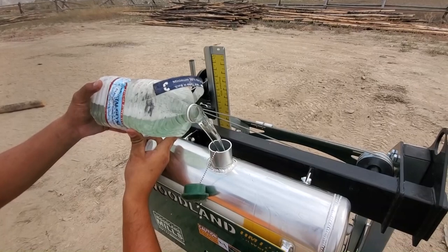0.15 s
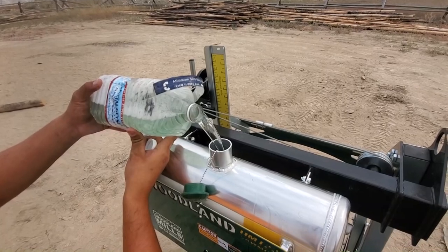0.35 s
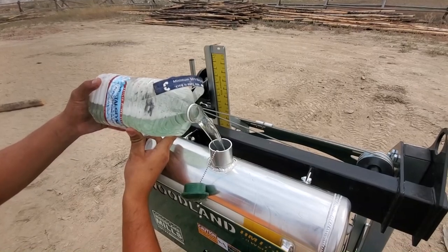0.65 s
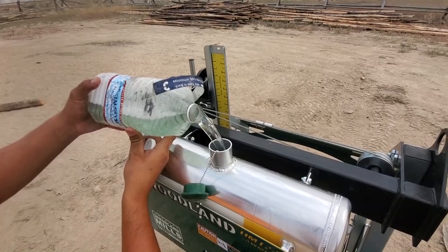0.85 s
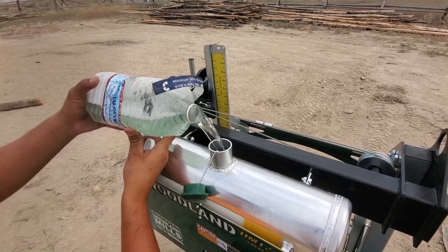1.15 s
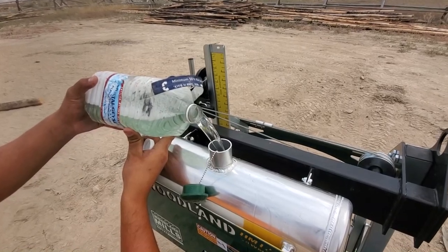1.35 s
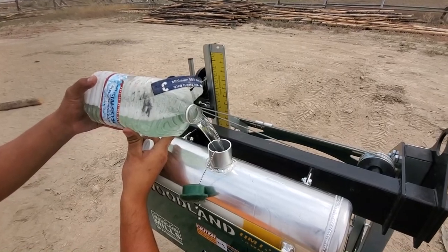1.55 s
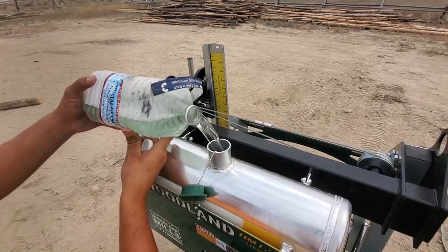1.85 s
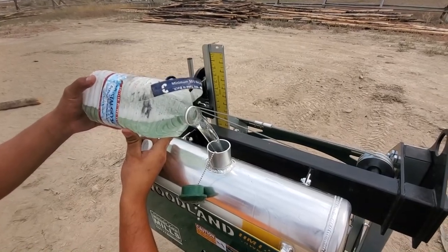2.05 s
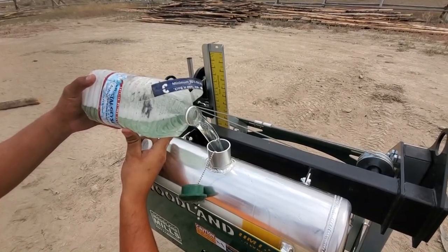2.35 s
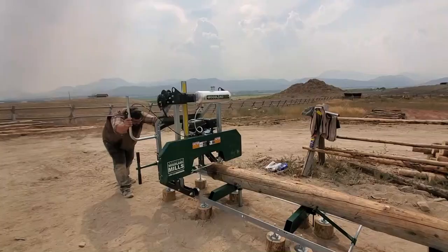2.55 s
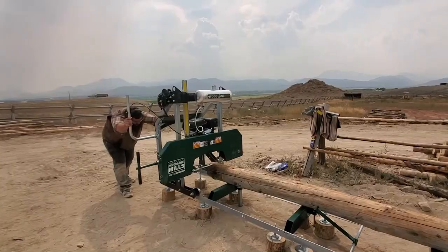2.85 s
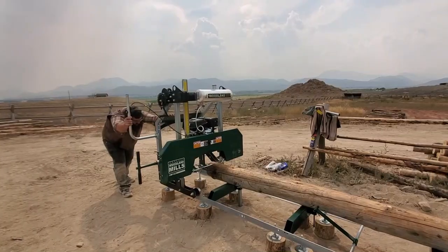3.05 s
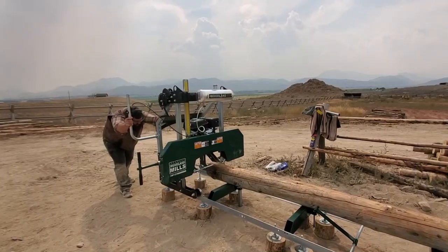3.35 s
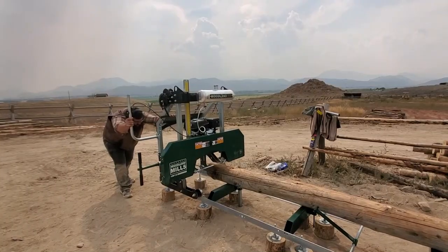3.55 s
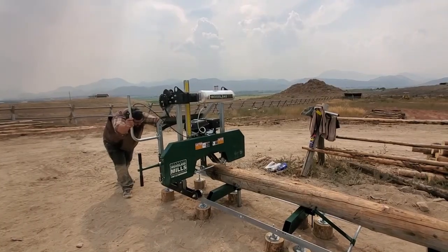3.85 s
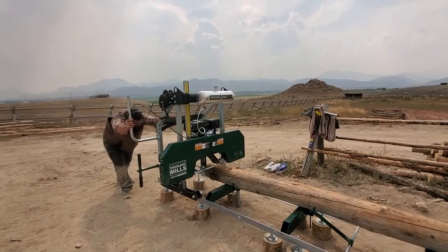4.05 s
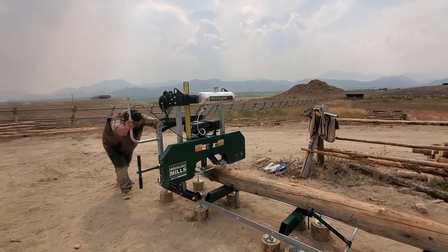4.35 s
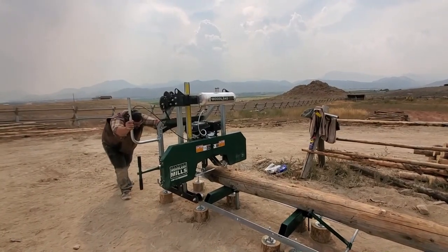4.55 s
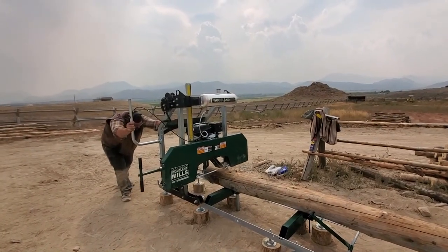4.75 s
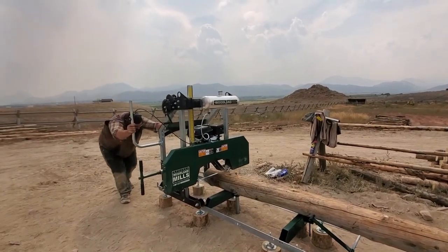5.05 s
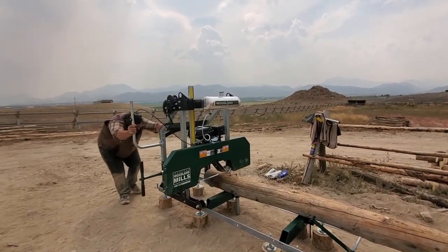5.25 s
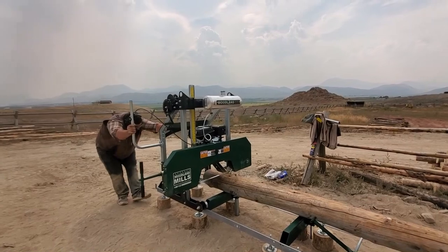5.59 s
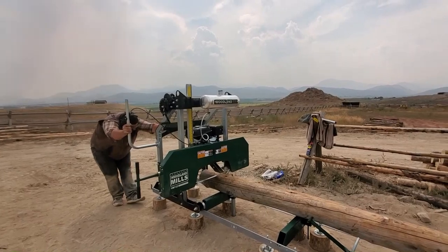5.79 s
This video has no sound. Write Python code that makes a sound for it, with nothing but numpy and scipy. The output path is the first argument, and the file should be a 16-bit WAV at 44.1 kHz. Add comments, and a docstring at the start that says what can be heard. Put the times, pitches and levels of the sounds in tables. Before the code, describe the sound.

Faint close pouring with hollow plops, a brief silence, then a roaring small engine and whining band blade that bites harshly into wood.

```python
"""Water pours into a small metal tank, close up: hissing stream, splashes and bubbles over a distant engine hum.
After a short silent gap a small gasoline sawmill runs outdoors: firing orders and a throbbing roar make
the engine drone, and resonant noise makes the free band blade sing high to the right. Then the blade bites
into a log and rasps lower, in noise whose rings and hiss shift. Wind puffs on the microphone."""
import sys
import numpy as np
from scipy import signal
from scipy.fft import rfft, irfft, next_fast_len
from scipy.io import wavfile
from scipy.ndimage import uniform_filter1d, map_coordinates

SR = 44100
rng = np.random.default_rng(int(sys.argv[2]) if len(sys.argv) > 2 else 0)


def put_to_file(sound):
    """Save the sound as 16-bit audio at rate SR, in the file named by the first command-line argument."""
    columns = np.atleast_2d(sound).T  # one column per channel
    safe = np.clip(columns, -1, 1)
    whole_steps = np.round(safe * 32767)
    wavfile.write(sys.argv[1], SR, whole_steps.astype(np.int16))


N = 261072

# Spectra are relative densities, modes are resonances; each finished layer gets its level separately.

# Engine firing orders: (multiple of the firing rate [1], level [dB])
FIRING_ORDERS = [(1, -24), (2, 1), (3, -21), (4, -5), (5, -3), (6, -42), (7, -16), (8, -7), (9, -17.5),
                 (10, -11.5), (11, -6), (12, -12.5), (13, -7.5), (14, -16.5), (15, -23), (16, -33),
                 (17, -24.5), (18, -18.5), (19, -31), (20, -13), (21, -16.5), (22, -14), (23, -10),
                 (24, -11), (25, -11.5), (26, -10), (27, -8), (28, -14.5), (29, -12.5), (30, -12)]
# Firing rate of the engine: (time [s], firings [1/s])
FIRING_RATE = [(2.43, 28.85), (3.5, 28.9), (4.7, 28.85), (5.0, 28.7), (5.92, 28.7)]
# Engine roar spectrum: (frequency [Hz], density [dB])
ROAR_SPECTRUM = [(20, -40), (40, -12), (100, -11.5), (250, -10), (500, -8.5), (900, -11), (1050, -6.5),
                 (2000, -8.5), (3500, -13.5), (7300, -21.5), (9000, -31)]
# Cowl and guard modes: (frequency [Hz], width [Hz], level [dB])
HOUSING_MODES = [(84, 15, -5), (225, 100, -5), (365, 84, -1), (658, 95, -2.5), (742, 154, -3.5),
                 (870, 82, -1.5), (1152, 108, -3), (1522, 24, -6), (1640, 42, -3.5), (1873, 32, -7),
                 (2120, 82, -1)]
# Cooling fan spectrum: (frequency [Hz], density [dB])
FAN_SPECTRUM = [(6000, -90), (7200, -46), (7700, -7), (9000, -7.5), (12300, -14.5), (12700, -4),
                (13500, -14), (14900, -8), (15500, 3.5), (16400, -5.5)]
# Free blade's broad sheen: (frequency [Hz], density [dB])
SHEEN_SPECTRUM = [(5000, -90), (6000, -32), (7500, -24.5), (9000, -12.5), (11000, -16), (14000, -15.5),
                  (16400, -20.5)]
# Singing modes of the free blade: (frequency [Hz], width [Hz], level [dB])
SINGING_MODES = [(7730, 55, -16), (9166, 800, -3.5), (9830, 200, -5), (12830, 280, -2.5),
                 (14900, 300, -7.5)]
# Whirr of the blade in its guides: (frequency [Hz], density [dB])
WHIRR_SPECTRUM = [(500, -90), (1500, -29), (2500, -8), (3300, -9), (4000, -24), (5000, -56)]
# Guide modes: (frequency [Hz], width [Hz], level [dB])
GUIDE_MODES = [(3226, 340, -1), (3500, 104, 4)]
# Strength of the whirr: (time [s], level [dB])
WHIRR_LEVEL = [(2.43, -36), (3.11, -36), (3.62, -28), (3.9, -30.5), (4.72, -29.5)]
# Hiss of the blade over its wheels: (frequency [Hz], density [dB])
WHEEL_SPECTRUM = [(2000, -90), (3000, -56), (3800, -0.5), (5000, -8), (7000, -11.5), (9000, -33)]
# Wheel modes: (frequency [Hz], width [Hz], level [dB])
WHEEL_MODES = [(3760, 150, -3), (4880, 76, -2), (5630, 58, 0)]
# Rasp of the teeth in wood: (frequency [Hz], density [dB])
RASP_SPECTRUM = [(900, -63), (1500, -11.5), (2300, -7), (3400, -0.5), (3800, -8), (5500, -8), (7000, -43),
                 (9000, -50)]
# Modes in the rasp: (frequency [Hz], width [Hz], level [dB])
RASP_MODES = [(2460, 310, 0.5), (3143, 200, 5.5), (3500, 90, -11), (4170, 37, 0)]
# Low, then high ring of the blade held in the wood, each a list of (frequency [Hz], width [Hz], level [dB])
KERF_MODES = [
    [(2051, 42, 5.5), (2127, 120, 1.5)],
    [(2740, 59, 0), (2830, 110, 6)],
]
# Strength of those rings: (time [s], low ring [dB], high ring [dB])
RING_LEVELS = [(4.79, -32, -42), (4.86, -31.5, -36), (5.0, -26, -26.5), (5.1, -25, -23.5),
               (5.18, -31.5, -37), (5.33, -28.5, -31), (5.4, -25, -23.5), (5.6, -31, -24.5),
               (5.92, -48, -23.5)]
# Sinking centre of the cutting hiss: (time [s], frequency [Hz])
HISS_CENTRE = [(4.7, 7240), (4.95, 6370), (5.15, 5970), (5.35, 5200), (5.92, 4460)]
# Splashes: (time [s], reference level [dB], bubble pitch [Hz], wall slap over the reference [dB])
SPLASHES = [(.18, -40, 2700, -25), (.197, -44, 1027, -14), (.287, -50, 2300, 0), (.364, -54, 1640, 0),
            (.408, -42, 1630, -8), (.477, -41, 1640, -10), (.522, -40, 2240, -8), (.623, -49.5, 2170, 2),
            (.704, -39, 2260, -20), (.824, -44, 1050, -14), (.857, -47, 708, -4), (1.022, -37, 1026, -21),
            (1.082, -43, 1650, -23), (1.285, -38.5, 2160, -26), (1.435, -45, 2190, -15),
            (1.452, -45, 1024, -20), (1.561, -46, 1044, -8), (1.574, -37.5, 1027, -6),
            (1.731, -45, 627, -3), (1.775, -46, 990, -20), (1.865, -40, 1770, -22), (1.914, -42, 1510, -22),
            (2.19, -46, 2280, -8), (2.328, -36.5, 1610, -17)]
# Strength of the stream: (time [s], level [dB])
FLOW_LEVEL = [(0, -56.5), (.1, -55.5), (.6, -56.5), (.76, -58.5), (.89, -55.5), (.97, -58), (1.2, -54.5),
              (1.4, -61), (1.46, -59.5), (1.53, -58.5), (1.77, -57.5), (2.34, -58)]
# Stream spectrum: (frequency [Hz], density [dB])
STREAM_SPECTRUM = [(500, -49), (800, -17), (2000, -9), (4000, -26), (6000, -16.5), (8000, -38),
                   (11000, -70)]
# Air and wall modes of the tank: (frequency [Hz], width [Hz], level [dB])
TANK_MODES = [(1027, 29, 2), (1534, 56, -2), (1685, 105, 0.5), (1880, 68, -5), (2160, 59, -5.5),
              (2308, 150, -5), (2683, 82, -1.5), (3190, 510, -3), (3720, 160, -9), (4350, 160, -12.5),
              (5290, 190, -17)]
# Spray spectrum: (frequency [Hz], density [dB])
SPRAY_SPECTRUM = [(4000, -44), (5300, -6.5), (6950, -6.5), (7500, -13.5), (9400, 4), (11300, -6.5),
                  (12500, -5), (15000, -15), (16400, -22)]
# Gurgle spectrum: (frequency [Hz], density [dB])
GURGLE_SPECTRUM = [(120, -48), (250, -16), (500, -9), (750, -3.5), (900, 0), (1100, -43)]
# Lowest air modes of the tank: (frequency [Hz], width [Hz], level [dB])
HOLLOW_MODES = [(380, 25, -17), (644, 40, 8), (702, 36, 7)]
# Air gulps in the tank: (time [s], level [dB])
GLUGS = [(.06, -66), (.55, -64), (.87, -65), (1.04, -68), (1.27, -63), (1.46, -80), (1.58, -66),
         (1.77, -58), (2.19, -76)]
# Water slapping the wall: (frequency [Hz], density [dB])
SLAP_SPECTRUM = [(1200, -50), (2200, -10), (3300, 5), (4400, 0), (5500, -16), (7000, -40)]
# Wind puffs on the ports: (time [s], half length [s], level [dB])
PUFFS = [(4.59, 0.025, -38), (4.967, 0.044, -38), (5.115, 0.037, -37), (5.62, 0.038, -33)]
# Wind buffeting spectrum: (frequency [Hz], density [dB])
BUFFET_SPECTRUM = [(15, -35), (40, -5), (60, -4), (110, -7), (200, -9), (350, -10), (600, -50)]
# Orders of the distant engine: (frequency [Hz], relative level [dB])
FAR_HUM_TONES = [(58.6, 1.5), (87.9, -5.5), (117.2, -19.5), (146.5, -19)]
# Hum level and unrest: (time [s], level [dB], depth of its dips [dB])
HUM_WAVERS = [(0, -60, .3), (.65, -60.5, .5), (1.0, -64, 2), (1.2, -60, 5), (1.8, -59.5, 5), (2.34, -59, 4)]
# Rumble under the hum: (frequency [Hz], density [dB])
FAR_RUMBLE_SPECTRUM = [(20, -48), (40, -21), (100, -22), (200, -38.5), (500, -43), (800, -66)]
# Treble edge of the microphone: (frequency [Hz], gain [dB])
MIC_RESPONSE = [(15700, 0), (15850, -30), (16000, -52), (16430, -68)]
# Engine at the two ports: (frequency [Hz], likeness [0-1], left minus right [dB], left leads by [rad])
MILL_PORTS = [(200, 1, 0, 0), (260, .95, -1.5, .1), (400, .85, -2.5, .2), (500, .88, -1, .2),
              (570, .99, -.3, .1), (700, .92, -.8, .35), (900, .9, -.8, .45), (1200, .75, -1, 1),
              (1400, .55, -1, 1.3), (1700, .15, 0, 0), (2050, .4, 0, -1), (4000, .3, -3, 0)]
# Fan at the ports: (frequency [Hz], likeness [0-1], left minus right [dB], left leads by [rad])
FAN_PORTS = [(7500, 0.35, 13, 2.5), (12000, 0.25, 9.7, 1), (15500, .3, 14.8, 1.8)]
# Free blade at the ports: (frequency [Hz], likeness [0-1], left minus right [dB], left leads by [rad])
SING_PORTS = [(2490, 0.2, -5.5, -2.5), (3140, 0.76, -7.5, 0), (4200, 0.35, -20.5, -2.8),
              (6150, 0.25, -12.5, 3.5), (9770, 0.97, -21.5, 1), (10100, 0.2, -15.5, 4.5),
              (15000, .3, -27, -2)]
# Cutting at the ports: (frequency [Hz], likeness [0-1], left minus right [dB], left leads by [rad])
RASP_PORTS = [(1500, .3, -5, 0), (2100, .75, -6, 0), (2800, .75, -14, 2.8), (3600, .6, -13, 3.8),
              (5300, .6, -12, 6.9), (7000, .4, -9, 10)]
# Pour at the ports: (frequency [Hz], likeness [0-1], left minus right [dB], left leads by [rad])
POUR_PORTS = [(60, .9, -1.5, 1), (210, 0.4, 0, 0), (770, 1, 0.5, -1.6), (1130, 0.56, 3, -0.2),
              (1760, 0.3, -10.5, 1), (2300, 0.45, -4, 0.1), (3220, 0, -14.5, -1), (4300, 0.2, -1.5, 0.5),
              (6400, 0, -7, 0.5), (9800, .2, -5.5, 2.5), (15000, .3, 1, -0.5)]

POUR_END_S, MILL_START_S = 2.342, 2.4205
BITE_S = 4.76  # the teeth reach the wood
# the level of engine, fan, singing and wheel hiss is faded up once
FADE_UP_START_S, FADE_UP_S, FADE_UP_DB = 3.05, 0.59, 4.5
DRONE_DB, ROAR_DB, FAN_DB = -31, -29, -32  # before the fade-up
LOAD_DB_PER_S = 0.9  # drone and roar keep growing while the blade is in the wood
SING_DB, SING_FLARE_DB = -27, 4  # before the fade-up; flare as the teeth touch
TOUCH_S, TOUCH_HALF_S = 4.79, 0.016  # first scrape of the teeth
SING_DAMP_DB, SING_DAMP_START_S, SING_DAMP_S = 20.5, 4.84, 0.065  # the wood stills the singing
WHEEL_DB, WHEEL_FADE_UPS = -37, 1.93  # level before the fade-up; multiple of its dB
RASP_DB, RASP_FADE_DB_PER_S = -21.5, 1.5
HISS_DB, HISS_FADE_DB_PER_S = -29.5, 3.5
RING_WAVER_DB = 1.5
SPRAY_DB, SPRAY_FOLLOWS = -67.5, 0.97  # mean level; share of the stream's swings
GURGLE_DB, GURGLE_RISE_DB_PER_S, GURGLE_WAVER_DB = -76.5, 6, 1  # grows as the tank fills
GLUG_HALF_S = 0.024
WASH_DB, THROW_DB, BUBBLE_DB = -14, -18, -10  # surge, thrown spray and bubble over a splash's reference
LUMPS_DB, DROPS_DB = -8, -12  # over the stream
LARGEST_SHARE = .93  # caps the size of chance lumps and droplets
WHISTLE_HZ, WHISTLE_WIDTH_HZ, WHISTLE_DB = 708, 12, -75  # a thin tone early in the pour
WHISTLE_END_S, WHISTLE_FADE_DB = .58, 25
FAR_RUMBLE_DB = -68.5
TOP_HZ = 16430  # band limit


def engine():
    """One firing every second turn: clean low orders, unsteady higher ones, throbbing roar, cooling fan."""
    rate_hz = curves(FIRING_RATE)[0] + 0.077 * wobble(3)
    phase = 2 * np.pi * np.cumsum(rate_hz) / SR
    jitter = 0.038 * wobble(14)  # timing scatter [rad] blurs the high orders most
    drone = np.zeros(N)
    for k, db in FIRING_ORDERS:
        level = amp(db + 0.2 * k ** 0.74 * wobble(9.8))
        drone += level * np.sin(k * (phase + jitter) + rng.uniform(0, 2 * np.pi))
    drone = stereo([drone, 0 * drone], np.ones_like, MILL_PORTS)
    throb = amp(0.5 * np.cos(phase) + 1.0 * np.cos(2 * phase) + 0.12 * wobble(14))
    roar = throb * stereo(patchy(patchy_db=1.5), colour(ROAR_SPECTRUM, HOUSING_MODES), MILL_PORTS)
    fan = stereo(patchy(patchy_db=0.3), colour(FAN_SPECTRUM, []), FAN_PORTS)
    load = amp(LOAD_DB_PER_S * in_wood_s())
    motor = load * (amp(DRONE_DB) * drone + amp(ROAR_DB) * roar)
    return amp(fade_up_db()) * (motor + amp(FAN_DB) * fan)


def blade():
    """Running free, the steel band sings, whirrs through its guides and hisses over its wheels."""
    sing = stereo(patchy(patchy_db=1.5), colour(SHEEN_SPECTRUM, SINGING_MODES), SING_PORTS)
    whirr = stereo(patchy(patchy_db=1.5), colour(WHIRR_SPECTRUM, GUIDE_MODES), SING_PORTS)
    hiss = stereo(patchy(patchy_db=2.0), colour(WHEEL_SPECTRUM, WHEEL_MODES), SING_PORTS)
    flare_db = SING_FLARE_DB * bumps([(TOUCH_S, 0)], TOUCH_HALF_S)
    damping_db = SING_DAMP_DB * ramp(SING_DAMP_START_S, SING_DAMP_S)
    sing_db = SING_DB + fade_up_db() + flare_db - damping_db
    whirr_db = curves(WHIRR_LEVEL)[0] + 0.78 * wobble(8)
    hiss_db = WHEEL_DB + WHEEL_FADE_UPS * fade_up_db()
    free = 1 - bite()  # the wood's grip stills the guides and wheels
    flutter = amp(0.27 * wobble(21.78))
    return flutter * (amp(sing_db) * sing + free * (amp(whirr_db) * whirr + amp(hiss_db) * hiss))


def cut():
    """Teeth rasp in the wood; as the blade sinks in, its rings trade places and the hiss grows duller."""
    rasp = stereo(patchy(patchy_db=1.5), colour(RASP_SPECTRUM, RASP_MODES), RASP_PORTS)
    rasp *= amp(RASP_DB - RASP_FADE_DB_PER_S * in_wood_s())
    for level_db, modes in zip(curves(RING_LEVELS), KERF_MODES):
        ring = stereo(rng.standard_normal((2, N)), colour([(1, -120)], modes), RASP_PORTS)
        rasp += amp(level_db + RING_WAVER_DB * wobble(55)) * ring
    sinking = gliding(patchy(patchy_db=2.0), HISS_CENTRE, width_hz=1640)
    hiss = stereo(sinking, np.ones_like, RASP_PORTS)
    hiss *= amp(HISS_DB - HISS_FADE_DB_PER_S * in_wood_s())
    return bite() * amp(0.18 * wobble(27)) * (rasp + hiss)


def pouring():
    """The stream hisses in the tank's resonances; lumps of water ring single modes and throw spray."""
    flow_db, = curves(FLOW_LEVEL)
    s, db, bubble_hz, slap_db = np.transpose(SPLASHES)

    when, how_big, which, detune = rng.random((4, 300))
    at = when * POUR_END_S
    # lumps leave the lowest mode alone: it hums on in the stream
    modes = np.array(TANK_MODES)[1 + (which * (len(TANK_MODES) - 1)).astype(int)]
    size = amp(-3 * np.log(1 - LARGEST_SHARE * how_big))
    lump_hz = modes[:, 0] + modes[:, 1] * (detune - .5)
    lumps = bubbles(at, lump_hz, size * amp(modes[:, 2]), t60=0.062)

    when, pitch, how_big = rng.random((3, 900))  # crisp droplets, far shorter
    drop_gain = amp(-3.5 * np.log(1 - LARGEST_SHARE * how_big))
    drops = bubbles(when * POUR_END_S, 1500 * 3.57 ** pitch, drop_gain, t60=0.0062, attack=0.00028)

    wet = amp(flow_db) + bursts(s, amp(db + WASH_DB), t60=0.077)
    tank = wet * stereo(patchy(patchy_db=1.5), colour(STREAM_SPECTRUM, TANK_MODES), POUR_PORTS)

    gurgle_db = GURGLE_DB + GURGLE_RISE_DB_PER_S * np.arange(N) / SR + GURGLE_WAVER_DB * wobble(14)
    gurgle = amp(gurgle_db) + bumps(GLUGS, GLUG_HALF_S)
    tank += gurgle * stereo(patchy(patchy_db=2.0), colour(GURGLE_SPECTRUM, HOLLOW_MODES), POUR_PORTS)

    slap = stereo(rng.standard_normal((2, N)), colour(SLAP_SPECTRUM, []), POUR_PORTS)
    tank += bursts(s, amp(db + slap_db), t60=0.055) * slap

    spray_db = SPRAY_DB + SPRAY_FOLLOWS * (flow_db - np.mean(FLOW_LEVEL, axis=0)[1])
    spray = amp(spray_db) * (1 + 0.89 * bursts(at, size, t60=0.03))
    spray += bursts(s, amp(db + THROW_DB), t60=.05)
    mist = spray * stereo(patchy(patchy_db=1.2), colour(SPRAY_SPECTRUM, []), POUR_PORTS)

    plops = amp(flow_db + LUMPS_DB) * unit(lumps) + amp(flow_db + DROPS_DB) * unit(drops)
    plops += bubbles(s, bubble_hz, amp(db + BUBBLE_DB), t60=0.12)
    plops = np.std(plops) * stereo([plops, 0 * plops], np.ones_like, POUR_PORTS)

    narrow = colour([(1, -120)], [(WHISTLE_HZ, WHISTLE_WIDTH_HZ, 0)])
    whistle = stereo(rng.standard_normal((2, N)), narrow, POUR_PORTS)
    tank += amp(WHISTLE_DB - WHISTLE_FADE_DB * ramp(WHISTLE_END_S, .05)) * whistle
    return tank + mist + plops + far_engine()


def wind():
    """Short puffs of low noise push the two ports in opposite ways."""
    t = np.arange(N) / SR
    gust = sum(amp(db) * np.exp(-np.square((t - s) / half)) for s, half, db in PUFFS)
    buffet = unit(filtered(rng.standard_normal(N), colour(BUFFET_SPECTRUM, [])))
    return gust * buffet * [[1], [-.7]]


def far_engine():
    """Low orders of a distant engine waver with the air, over a rumble."""
    t = np.arange(N) / SR
    tones = np.zeros(N)
    for hz, db in FAR_HUM_TONES:
        tones += amp(db + 1.5 * wobble(6.7)) * np.sin(2 * np.pi * hz * t + 2.0 * wobble(3.6))
    rumble = stereo(rng.standard_normal((2, N)), colour(FAR_RUMBLE_SPECTRUM, []), POUR_PORTS)
    level_db, dips_db = curves(HUM_WAVERS)
    hum_db = level_db - dips_db * np.square(wobble(11.57))
    lean = amp([[-.8], [.8]])  # slightly to the right
    return amp(hum_db) * unit(tones) * lean + amp(FAR_RUMBLE_DB) * rumble


def fade_up_db():
    """How far the level of the mill has been faded up [dB]."""
    return FADE_UP_DB * ramp(FADE_UP_START_S, FADE_UP_S)


def in_wood_s():
    """Seconds since the teeth reached the wood."""
    return np.maximum(np.arange(N) / SR - BITE_S, 0)


def bite():
    """0 while the blade runs free, rising to 1 as it enters the wood."""
    return ramp(BITE_S, 0.12)


def bubbles(times, pitch_hz, gains, t60, attack=0.0027):
    """Short dying tones with a soft start whose pitch creeps up."""
    t = np.arange(round(t60 * SR)) / SR
    tones = np.sin(2 * np.pi * pitch_hz[:, None] * t * (1 + 0.49 * t))
    tones *= amp(-60 * t / t60) * (1 - np.exp(-t / attack))
    at = np.round(times * SR).astype(int)[:, None] + np.arange(len(t))
    return np.bincount(at.ravel(), (gains[:, None] * tones).ravel(), N)[:N]


def bursts(times, gains, t60):
    """An envelope that jumps at each time and dies away by 60 dB in t60 seconds."""
    kicks = np.bincount(np.round(times * SR).astype(int), gains, N)[:N]
    return signal.lfilter([1], [1, -amp(-60 / (t60 * SR))], kicks)


def bumps(rows, half_s):
    """Bell-shaped swells at (time [s], level [dB])."""
    return sum(amp(db) * np.exp(-np.square((np.arange(N) / SR - s) / half_s)) for s, db in rows)


def ramp(start_s, length_s):
    """0 before the start, 1 after the length, straight between."""
    return np.clip((np.arange(N) / SR - start_s) / length_s, 0, 1)


def patchy(patchy_db):
    """Two white noises sharing patches of random gain in time and frequency."""
    z = signal.stft(rng.standard_normal((2, N)), nperseg=512)[2]
    field = uniform_filter1d(rng.standard_normal(z.shape[1:]), 6, 0)
    field = uniform_filter1d(field, 8, 1)
    return signal.istft(z * amp(patchy_db * unit(field)), nperseg=512)[1][:, :N]


def gliding(pair, centre, width_hz):
    """Noise in a band whose centre moves; the width is taken 6 dB down."""
    hz, t, z = signal.stft(pair, SR, nperseg=512)
    offset = hz[:, None] - np.interp(t, *np.transpose(centre))
    band = 1 / (1 + (2 * offset / width_hz) ** 2)
    return signal.istft(z * band, SR, nperseg=512)[1][:, :N]


def stereo(pair, gain, ports):
    """Two unrelated signals mixed to a likeness, balance and lead per frequency; rms 1."""
    m = next_fast_len(N + 8192)
    hz = np.fft.rfftfreq(m, 1 / SR)
    f, *cols = np.transpose(ports)
    alike, left_db, lead = [along(np.transpose([f, c]), hz) for c in cols]
    turn = np.arccos(np.clip(alike, 0, 1)) / 2
    same, other = rfft(np.asarray(pair), m) * [np.cos(turn), np.sin(turn)]
    lean = amp(left_db / 2) * np.exp(.5j * lead)
    level = gain(hz) / np.sqrt(np.cosh(left_db * np.log(10) / 10))  # balance keeps the power
    return unit(irfft(level * [(same + other) * lean, (same - other) / lean], m)[:, :N])


def colour(spectrum, modes):
    """Gain of a broad spectrum with resonance peaks standing on it."""
    def gain(hz):
        power = amp(2 * along(spectrum, hz))
        for centre, width, db in modes:
            power = power + amp(2 * db) / np.square(1 + np.square(2 * (hz - centre) / width))
        return np.sqrt(power)
    return gain


def filtered(x, response):
    """x times a response of frequency."""
    m = next_fast_len(N + SR // 4)
    return irfft(rfft(x, m) * response(np.fft.rfftfreq(m, 1 / SR)), m)[..., :N]


def wobble(rate):
    """A smooth random curve, rate knots a second."""
    coarse = np.arange(0, N + 64, 64)
    knots = rng.standard_normal(int(N * rate / SR) + 4)
    smooth = map_coordinates(knots, [coarse * rate / SR])
    return np.interp(np.arange(N), coarse, smooth)


def curves(rows):
    """One value per sample for each column after the time."""
    s, *cols = np.transpose(rows)
    return [np.interp(np.arange(N) / SR, s, c) for c in cols]


def along(points, hz):
    """(frequency [Hz], value) points read on a log axis."""
    f, v = np.transpose(points)
    return np.interp(np.log(hz + 1), np.log(f + 1), v)


def amp(db):
    """Decibels to amplitude."""
    return 10 ** (np.asarray(db) / 20)


def unit(x):
    """x scaled to rms 1."""
    return x / np.sqrt(np.mean(x ** 2) + 1e-20)


def scene():
    """The pour, a gap holding only its fading trace, then the sawmill."""
    t = np.arange(N) / SR
    fade = np.where(t < POUR_END_S, 1, amp(-13 - 1000 * (t - POUR_END_S)))
    mill = engine() + blade() + cut() + wind()
    return fade * pouring() + (t >= MILL_START_S) * mill


def record(dry):
    """The microphone's treble falls away steeply and nothing stays above its band limit."""
    return filtered(dry, lambda hz: amp(along(MIC_RESPONSE, hz)) * (hz < TOP_HZ))


dry = scene()
out = record(dry)
put_to_file(out)
```